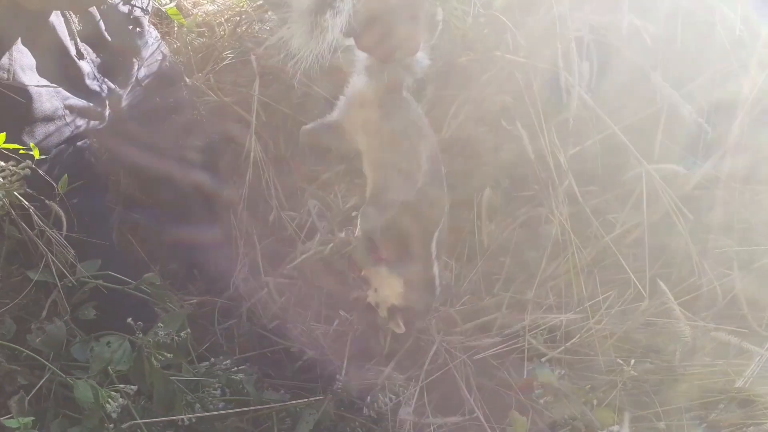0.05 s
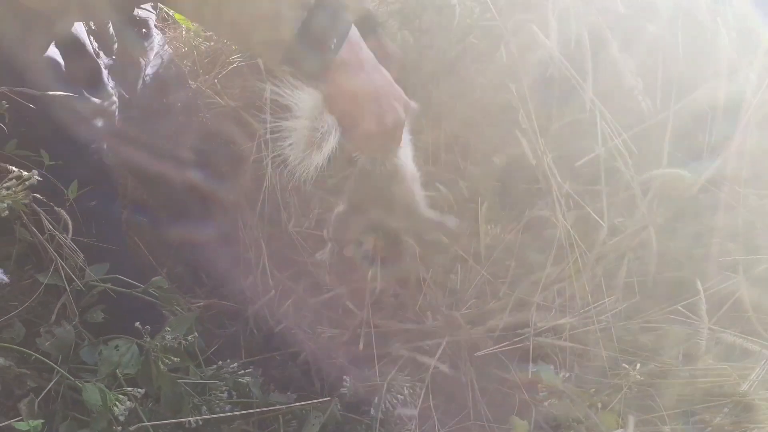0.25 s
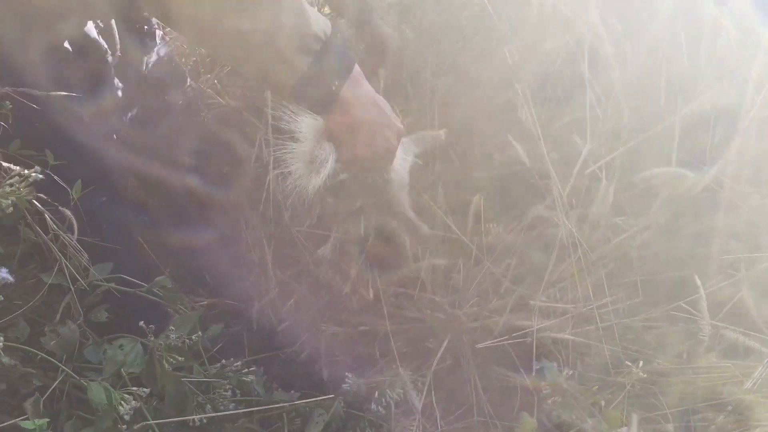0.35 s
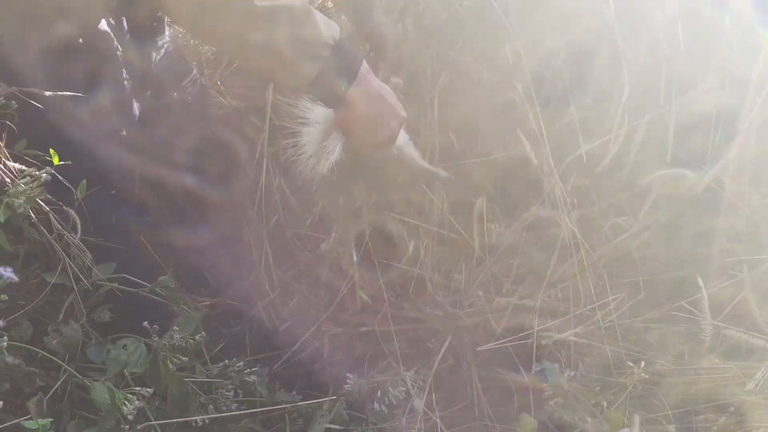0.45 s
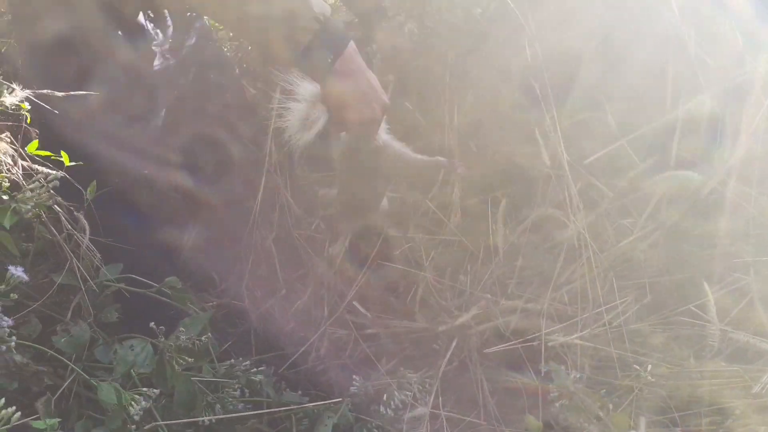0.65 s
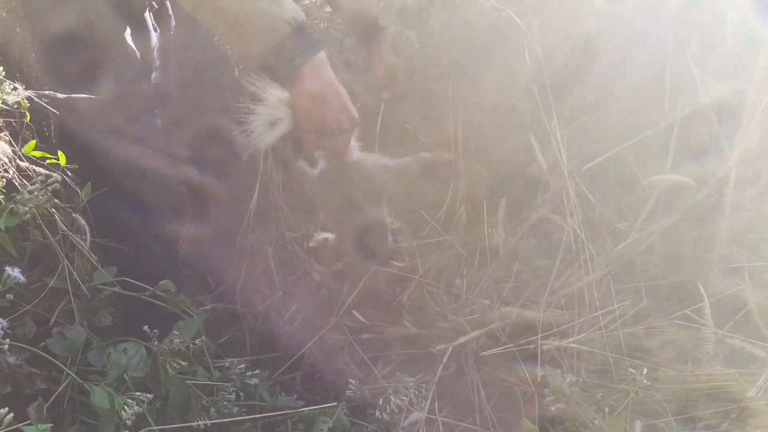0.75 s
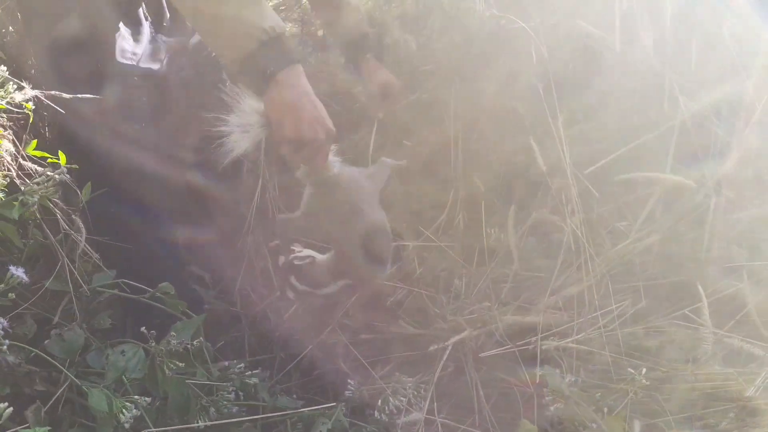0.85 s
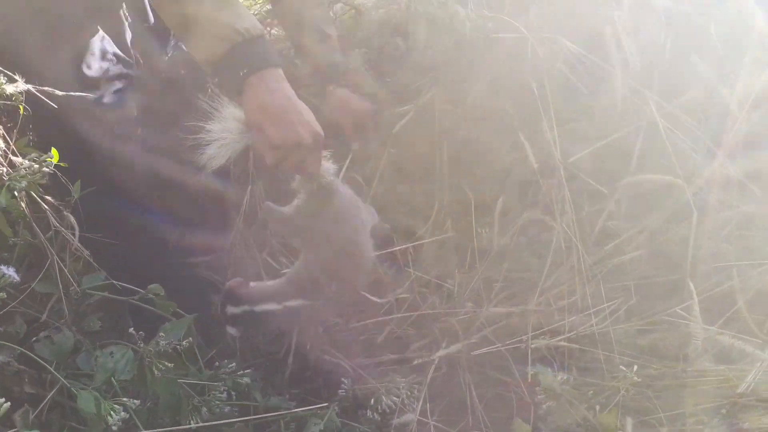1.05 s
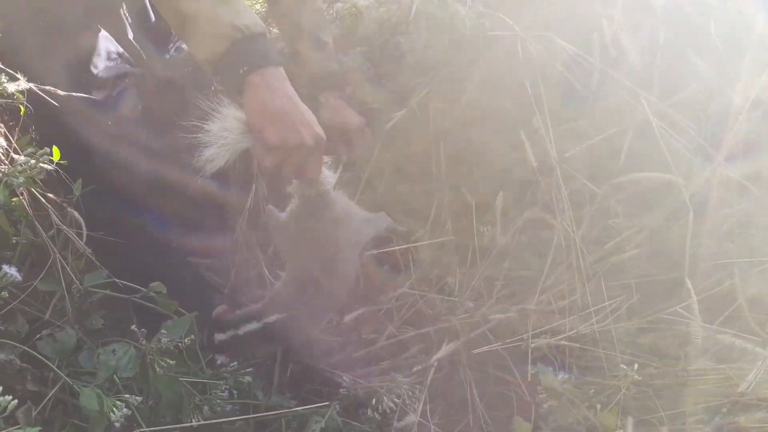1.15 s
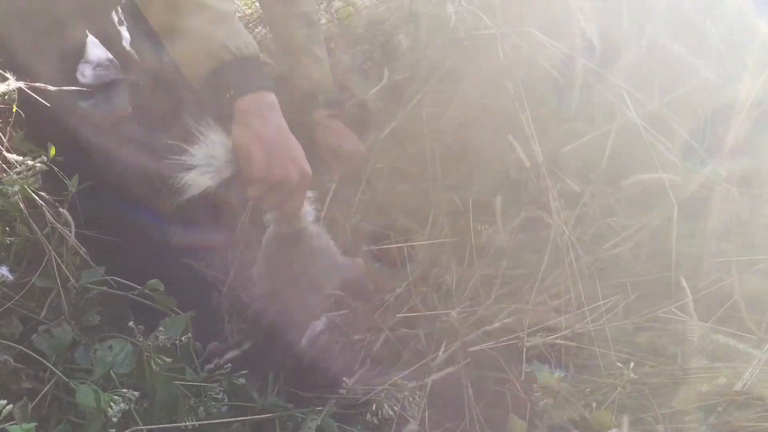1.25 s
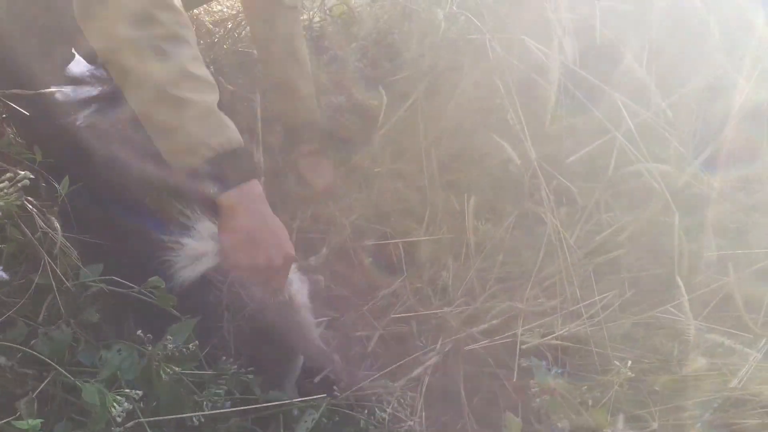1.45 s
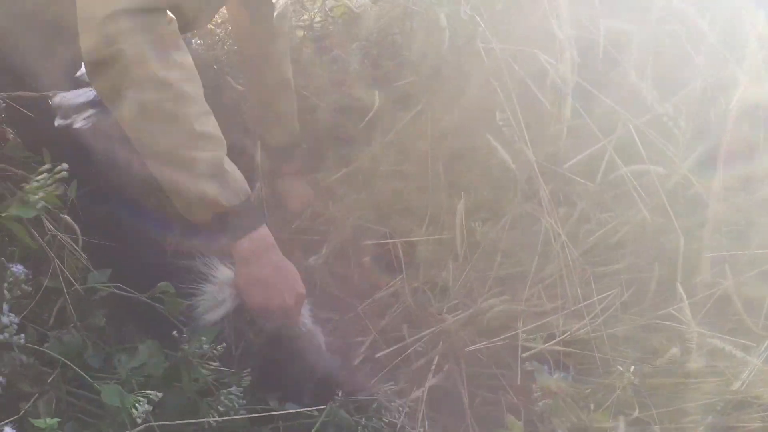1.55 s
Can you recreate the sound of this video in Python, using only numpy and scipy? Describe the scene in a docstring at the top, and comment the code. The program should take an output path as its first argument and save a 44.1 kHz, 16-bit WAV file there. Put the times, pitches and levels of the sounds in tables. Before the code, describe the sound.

A small wild animal hisses harshly twice, close to the microphone, and starts a third hiss. A hoarse growl runs beneath each one, while dry grass crackles faintly over quiet outdoor noise.

```python
"""A small wild animal, held down in dry grass, hisses twice at close range and starts a third time.
Each hiss is fluttering breath ringing in the mouth, whose shape changes as the jaws part.
A hoarse growl sounds in the throat below it, with brief rough tones and a fine sizzle on top.
Diffuse sound and short drifting echoes widen the hiss in stereo.
Grass crackles faintly over a low rumble and quiet outdoor noise."""
import sys
import numpy as np
from scipy import signal
from scipy.fft import rfft, irfft, next_fast_len
from scipy.io import wavfile
from scipy.ndimage import uniform_filter1d

SR = 44100
rng = np.random.default_rng(int(sys.argv[2]) if len(sys.argv) > 2 else 0)


def dump(signal):
    """Clip the signal to [-1, 1] and save it as 16-bit WAV at the path in sys.argv[1]."""
    limited = np.clip(np.atleast_2d(signal).T, -1, 1)
    pcm = np.round(limited * 32767).astype(np.int16)
    wavfile.write(sys.argv[1], SR, pcm)


N = 70560
T = np.arange(N) / SR

# Breath force per hiss. Each row: time in seconds, level in dB.
FORCE_1_DB = [(.035, -69), (.056, -50), (.085, -45.5), (.095, -42), (.135, -31.5), (.18, -34.5),
              (.265, -28), (.295, -23), (.352, -18.5), (.41, -22), (.44, -21.5), (.49, -20.5), (.595, -18),
              (.63, -18.5), (.682, -19), (.70, -30.5), (.722, -44.5), (.80, -65.5)]
FORCE_2_DB = [(.825, -60.5), (.865, -37.5), (.92, -31), (.96, -33), (1.01, -27.5), (1.025, -23.5),
              (1.10, -24), (1.15, -20.5), (1.215, -22.5), (1.275, -19), (1.305, -24.5), (1.338, -31),
              (1.358, -46.5), (1.43, -69)]
FORCE_3_DB = [(1.47, -62), (1.51, -41), (1.572, -43), (1.6, -33.5)]
# Resonances per mouth shape. Each row: centre in Hz, width in Hz, relative level in dB.
PARTED = [(1270, 210, -12), (1698, 470, -3), (2213, 440, -2), (3010, 1300, -5.5), (4260, 920, -7),
          (5100, 6500, -15.5)]
GAPING = [(1226, 150, -8.5), (1820, 1120, 1), (2280, 420, -14), (2902, 260, 0), (3350, 260, -6),
          (3955, 580, -5), (4740, 510, -5), (5770, 2800, -7)]
SNARLING = [(797, 300, -24), (1284, 170, -17.5), (1770, 650, -3.5), (2276, 610, 1), (3336, 500, -8),
            (4250, 1060, -3.5), (4970, 2200, -9), (6160, 1860, -13)]
PARTED_AGAIN = [(1257, 130, -5.5), (1580, 300, 0), (2056, 300, 1), (2450, 400, 2.5), (3450, 700, -0.5),
                (4360, 600, -7), (5789, 3100, -11)]
SPITTING = [(1382, 260, -10.5), (1780, 680, -1.5), (2170, 750, -3), (2953, 520, -1), (3910, 505, -9),
            (4360, 1150, -3.5), (5600, 710, -13.5), (6370, 2700, -14.5)]
NEARLY_SHUT = [(1280, 1500, -3), (1970, 450, 3), (3260, 480, -28), (5760, 2700, -11.5)]
# Jaw positions per hiss. Each row: start in seconds, mouth shape.
SHAPES_1 = [(0, PARTED), (0.276, GAPING), (0.378, SNARLING)]
SHAPES_2 = [(.8, PARTED_AGAIN), (1.022, SPITTING)]
SHAPES_3 = [(1.45, NEARLY_SHUT)]
# Resonances moved by lips and tongue. Each row: time in seconds, main centre in Hz, upper centre in Hz.
GLIDE_1_HZ = [(0.081, 2280, 4300), (0.188, 2137, 4150), (.27, 2292, 4250), (.305, 2772, 4300),
              (.35, 2954, 4700), (.39, 2064, 4100), (0.461, 2380, 4350), (.54, 2046, 4300),
              (0.606, 2154, 4220), (0.659, 2481, 4450), (0.719, 2403, 4500)]
GLIDE_2_HZ = [(0.859, 2200, 4190), (.93, 2300, 4217), (1.02, 2330, 4400), (1.131, 2380, 4310),
              (1.19, 2600, 4333), (1.263, 2720, 4660), (1.329, 2650, 3856)]
GLIDE_3_HZ = [(1.502, 1893, 4400), (1.6, 1920, 4440)]
def hiss(force, shapes, glide, jaw_move_s=0.025):
    """Fluttering breath rings in the mouth's successive shapes and in two gliding resonances."""
    puffs = flutter()
    breath = mouth(shapes[0][1], puffs)
    for start_s, shape in shapes[1:]:
        share = np.clip((T - start_s) / jaw_move_s + .5, 0, 1)
        breath = np.sqrt(1 - share) * breath + np.sqrt(share) * mouth(shape, puffs)
    times_s, main_hz, upper_hz = np.transpose(glide)
    effort = level(force) / level(FORCE_1_DB).max()
    main = from_db(-4.5) * gliding_resonance(times_s, main_hz, puffs, width_hz=276)
    upper = from_db(-10) * effort ** 0.52 * gliding_resonance(times_s, upper_hz, puffs, width_hz=340)
    breath = butterworth(breath + main + upper, 7680, order=8)
    return steady(breath, window_s=0.038) * level(force) * catches()


def mouth(shape, puffs, swell_db=1.8, swell_hz=12):
    """Air noise in one mouth shape; each resonance swells and sinks on its own."""
    out = 0
    for hz, width_hz, db in shape:
        out += turbulence([(hz, width_hz, 0)], puffs) * from_db(db + swell_db * wander(swell_hz))
    return unit_power(out)


def gliding_resonance(times_s, centres_hz, puffs, width_hz):
    """Puffs of air noise in a resonance whose centre moves."""
    carrier = np.cos(2 * np.pi * np.cumsum(np.interp(T, times_s, centres_hz)) / SR)
    radius = np.exp(-np.pi * width_hz / SR)
    low_noise = signal.lfilter([1], [1, -2 * radius, radius ** 2], puffs * rng.standard_normal((3, N)))
    return steady(unit_power(low_noise * carrier), window_s=0.028)


def flutter(rate_hz=131.5, jitter=.4, decay_s=0.0075, depth=0.85):
    """Airflow gain: soft tissue flaps unevenly, letting out a puff each time."""
    gaps_s = np.exp(jitter * rng.standard_normal(600)) / rate_hz
    flaps_s = np.r_[0, np.cumsum(gaps_s)]
    since_flap_s = T - flaps_s[np.searchsorted(flaps_s, T, side="right") - 1]
    return 1 + depth * np.exp(-since_flap_s / decay_s)


# Catches of breath. Each row: start in seconds, gain in dB.
CATCHES_DB = [(.054, 12.5), (0.091, 10), (0.234, 5.5), (0.421, 3), (0.454, 4), (.563, 1.5), (0.846, 8.5),
              (1.038, -4)]
def catches(length_s=0.0084):
    """Gain of the breath as it catches and bursts out."""
    return from_db(sum(db * np.exp(-(2 * (T - s) / length_s - 1) ** 4) for s, db in CATCHES_DB))


# Growl strength per hiss. Each row: time in seconds, level in dB.
GROWL_1_DB = [(.03, -99), (.048, -51), (.09, -47.5), (.2, -44), (.27, -46.5), (.32, -50), (.4, -50),
              (.52, -64.5), (.58, -56.5), (.66, -59), (.69, -52), (.72, -60)]
GROWL_2_DB = [(.82, -62.5), (.86, -46.5), (.96, -41), (1.07, -38), (1.1, -43), (1.136, -40), (1.175, -44),
              (1.198, -37.5), (1.22, -41), (1.285, -40.5), (1.335, -40), (1.358, -54.5), (1.46, -66)]
GROWL_3_DB = [(1.47, -67), (1.495, -51), (1.55, -47), (1.6, -44)]
# Throat resonances. Each row: centre in Hz, width in Hz, relative level in dB.
THROAT_1 = [(286, 116, -9.5), (360, 155, 0), (514, 186, 2.5), (712, 150, -0.5)]
THROAT_2 = [(333.6, 80, 0.5), (423, 214, -2), (519, 294, -1), (816, 150, -9.5), (1080, 190, -9)]
THROAT_3 = [(232, 300, 2), (486, 73, -2.5), (805, 110, -2)]
def growl(strength, throat):
    """Hoarse, pitchless flapping rings low in the throat."""
    rasp = butterworth(turbulence(throat, flutter()), 205, "high", order=6)
    return steady(rasp, window_s=0.055) * level(strength)


# Voiced moments. Each row: middle in seconds, half-length in seconds, pitch in Hz,
# glide in Hz per second, level in dB.
ROUGH_TONES = [(0.18, 0.075, 258, -7, -46.5), (0.268, 0.054, 520, 2.5, -46), (0.304, 0.032, 1230, 20, -37),
               (0.597, .035, 4220, -1500, -25), (0.652, .07, 845, 298.5, -49),
               (0.689, .025, 1170, -4000, -40.5), (1.136, 0.038, 332, 1199.5, -38),
               (1.2, 0.024, 358, 6.5, -35), (1.25, 0.044, 820, 4.5, -39.5)]
def rough_tones(waver_hz=110.4, waver_depth=0.0347):
    """Short, wavering tones where the throat or mouth locks onto one pitch."""
    out = 0
    for middle_s, half_s, hz, glide_hz_per_s, db in ROUGH_TONES:
        pitch_hz = hz + glide_hz_per_s * np.clip(T - middle_s, -half_s, half_s)
        pitch_hz *= 1 + waver_depth * wander(waver_hz)
        envelope = from_db(db) * np.exp(-2 * ((T - middle_s) / half_s) ** 2)
        out += envelope * np.sqrt(2) * np.sin(2 * np.pi * np.cumsum(pitch_hz) / SR)
    return out


# Sizzle strength. Each row: time in seconds, level in dB.
SIZZLE_DB = [(0, -84), (.11, -58), (.22, -60.5), (.29, -57), (.346, -49), (.404, -55), (.69, -56.5),
             (.73, -73), (.83, -69), (.92, -63), (1.05, -56.5), (1.118, -61.5), (1.162, -51), (1.2, -54.5),
             (1.264, -49), (1.322, -55.5), (1.39, -71.5), (1.6, -61)]
# Sizzle spectrum. Each row: centre in Hz, width in Hz, relative level in dB.
SIZZLE_BANDS = [(12300, 1600, -8.5), (10930, 1900, -16.5)]
def sizzle():
    """The finest hiss of air and dry stalks, at the top of the treble."""
    return turbulence(SIZZLE_BANDS, flutter(), channels=2) * level(SIZZLE_DB)


# Direct sound. Each row: frequency in Hz, phase lead of the left side in radians.
LEAD_1_RAD = [(1200, 0.37), (2200, -0.5), (2550, 1.4), (2800, 2.2), (3050, 3.7), (3800, 5.3), (4600, 7.77),
              (7000, 4.3)]
LEAD_2_RAD = [(900, 0.3), (1400, 1.26), (2300, 3), (3400, 4.07), (4200, 9.7), (5200, 10.8), (7000, 34)]
# Balance. Each row: frequency in Hz, left minus right in dB.
PAN_1_DB = [(900, -0.5), (1300, -2), (2100, -7), (3300, 0), (4300, -5), (6500, -7.5)]
PAN_2_DB = [(900, 0), (1400, -3), (2000, -5.5), (3000, 1), (4300, -1.5), (6500, -4.5)]
PAN_3_DB = [(1000, -1), (1900, -4), (3300, -7), (6000, -6)]
# Stereo spread. Each row: frequency in Hz, level against the direct sound in dB.
SPREAD_1_DB = [(300, -8), (800, -23), (1300, -5), (2200, -1.5), (2900, -1.5), (3500, -6.5), (4300, 3.5),
               (6500, 4.5)]
SPREAD_2_DB = [(300, -14), (800, -6), (1300, -2), (2400, -4.5), (3400, 1), (4300, 0.5), (6500, 8)]
def place(source, lead_rad, pan_db, spread_db, echo_share=.8):
    """Stereo spread: the two sides are out of step, widened by diffuse sound and short echoes."""
    direct, diffuse = source[0], source[1:]
    size = next_fast_len(N + 4096)
    hz = np.fft.rfftfreq(size, 1 / SR)
    sides = np.array([[.5], [-.5]])
    phase_rad = np.interp(hz, *np.transpose([(0, 0), *lead_rad]))
    spread = from_db(at_hz(spread_db, hz))
    delayed = np.array([echoes(direct), echoes(direct)])
    wide = np.sqrt(echo_share) * delayed + np.sqrt(1 - echo_share) * diffuse
    spectrum = rfft(direct, size) * np.exp(1j * sides * phase_rad) + spread * rfft(wide, size)
    balance = from_db(sides * at_hz(pan_db, hz))
    power = (1 + spread ** 2) * np.mean(balance ** 2, axis=0)
    return irfft(spectrum * balance / np.sqrt(power), size)[:, :N]


def echoes(x, count=8, base_s=.0005, range_s=.004, drift_s=.0005):
    """Very short echoes with drifting delays, together about as strong as the sound itself."""
    out = 0
    for lag, cycle, polarity in rng.random((count, 3)):
        delay_s = base_s + lag * range_s + drift_s * np.sin(2 * np.pi * (T + cycle))
        out += np.sign(polarity - .5) * np.interp(T - delay_s, T, x)
    return out / np.sqrt(count)


# Stalk resonances. Each row: centre in Hz, width in Hz, relative level in dB.
STALK_BANDS = [(1470, 1500, 4), (3070, 6000, -16), (5400, 1000, -0.5)]
def grass(crackles_per_s=900, spread_db=3, level_db=-62):
    """Dry stalks crackle at random under the struggling animal."""
    sizes = from_db(spread_db * np.minimum(rng.exponential(1, N), 4))
    snaps = rng.random(N) < crackles_per_s / SR
    return from_db(level_db) * turbulence(STALK_BANDS, sizes * snaps)


# Rumble spectrum. Each row: centre in Hz, width in Hz, relative level in dB.
RUMBLE_BANDS = [(62, 82, -2.5), (122, 150, 9)]
# Rumble strength. Each row: time in seconds, gain in dB.
RUMBLE_DB = [(0, -93), (.1, -67), (.22, -64), (.32, -68), (.6, -73.5), (.8, -69.5), (.95, -68), (1.08, -63),
             (1.2, -63.5), (1.32, -65.5), (1.6, -63.5)]
def rumble():
    """Faint low noise swells and sinks."""
    return butterworth(turbulence(RUMBLE_BANDS), [40, 170], "band", order=6) * level(RUMBLE_DB)


# Background spectrum. Each row: centre in Hz, width in Hz, relative level in dB.
OUTDOOR_BANDS = [(332, 450, -4), (744, 870, -6.5), (2330, 3200, 2.5)]
def outdoors(level_db=-56.5):
    """Quiet, steady, broad outdoor noise."""
    return from_db(level_db) * turbulence(OUTDOOR_BANDS)


def turbulence(bands, gate=1, channels=3):
    """Gated noise ringing in a set of resonances, independent in each channel."""
    out = 0
    for hz, width_hz, db in bands:
        out += from_db(db) * resonate(gate * rng.standard_normal((channels, N)), hz, width_hz)
    return unit_power(out)


def resonate(x, hz, width_hz):
    """A resonance applied twice, for deep valleys; unit power."""
    radius = np.exp(-np.pi * width_hz / SR)
    section = [1 - radius, 0, radius - 1, 1, -2 * radius * np.cos(2 * np.pi * hz / SR), radius ** 2]
    return unit_power(signal.sosfilt([section, section], x + 1e-18))


def steady(x, window_s):
    """Level out slow chance swells."""
    power = uniform_filter1d(x ** 2, int(window_s * SR), axis=-1)
    return x / np.sqrt(np.abs(power) + 1e-6)


def wander(rate_hz):
    """Smooth random motion of unit spread."""
    return unit_power(butterworth(rng.standard_normal(N), rate_hz, order=2))


def level(curve, fall_db_per_s=200):
    """Gain from a dB curve over time, dying quickly beyond its ends."""
    times_s, db = np.transpose(curve)
    outside_s = np.maximum(times_s[0] - T, 0) + np.maximum(T - times_s[-1], 0)
    return from_db(np.interp(T, times_s, db) - fall_db_per_s * outside_s)


def at_hz(points, hz):
    """Read a table on a log-frequency axis."""
    points_hz, values = np.transpose(points)
    return np.interp(np.log(hz + 1), np.log(points_hz), values)


def butterworth(x, hz, kind="low", *, order):
    return signal.sosfilt(signal.butter(order, hz, kind, fs=SR, output="sos"), x)


def unit_power(x):
    return x / np.sqrt(np.mean(x ** 2) + 1e-20)


def from_db(db):
    return 10 ** (np.asarray(db) / 20)


def scene():
    """Three hisses with their growls, in the grass; the animal turns after the first."""
    first = hiss(FORCE_1_DB, SHAPES_1, GLIDE_1_HZ) + growl(GROWL_1_DB, THROAT_1)
    second = hiss(FORCE_2_DB, SHAPES_2, GLIDE_2_HZ) + growl(GROWL_2_DB, THROAT_2)
    third = hiss(FORCE_3_DB, SHAPES_3, GLIDE_3_HZ) + growl(GROWL_3_DB, THROAT_3)
    fade_in = np.clip(T / 0.094, .2, 1)
    surroundings = (grass() + outdoors()) * fade_in + rumble()
    return (place(first, LEAD_1_RAD, PAN_1_DB, SPREAD_1_DB)
            + place(second + surroundings, LEAD_2_RAD, PAN_2_DB, SPREAD_2_DB)
            + place(third, LEAD_2_RAD, PAN_3_DB, SPREAD_2_DB)
            + rough_tones() + sizzle())


def record(dry, cutoff_hz=13050):
    """The top treble is cut steeply."""
    return signal.sosfilt(signal.ellip(12, .2, 80, cutoff_hz, fs=SR, output="sos"), dry)


dry = scene()
out = record(dry)
dump(out)
```